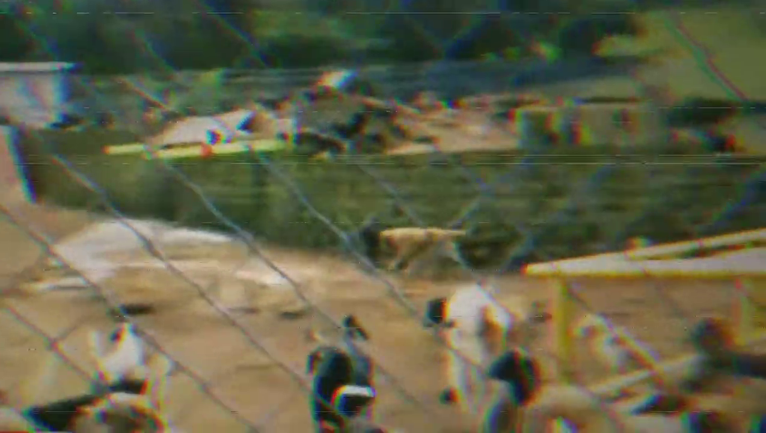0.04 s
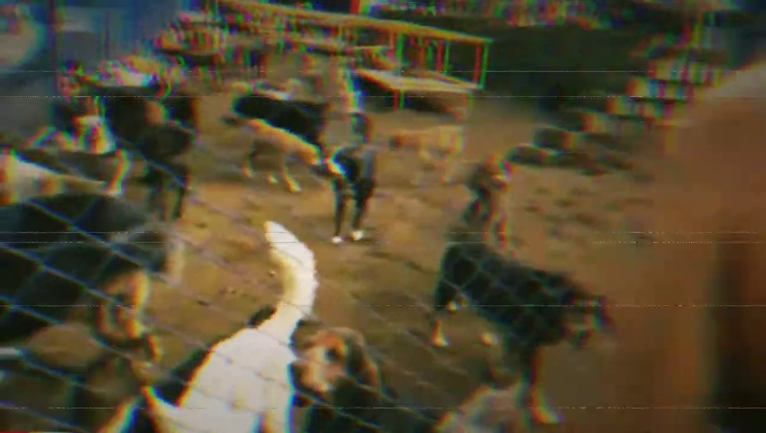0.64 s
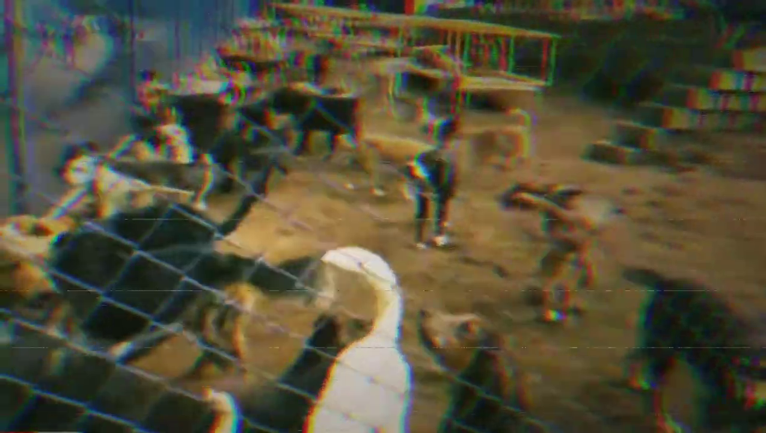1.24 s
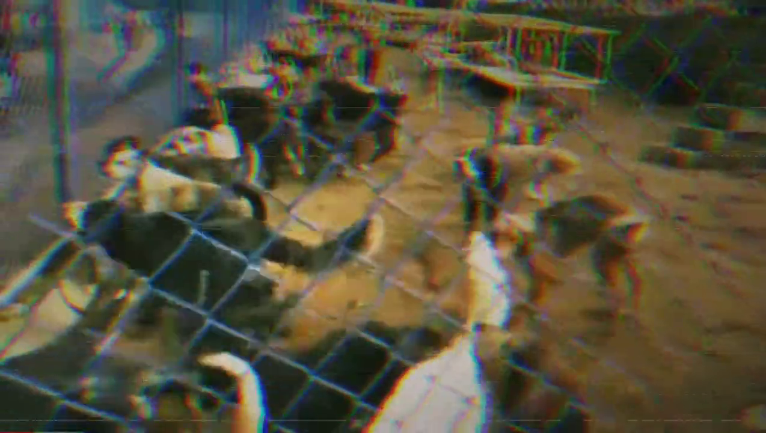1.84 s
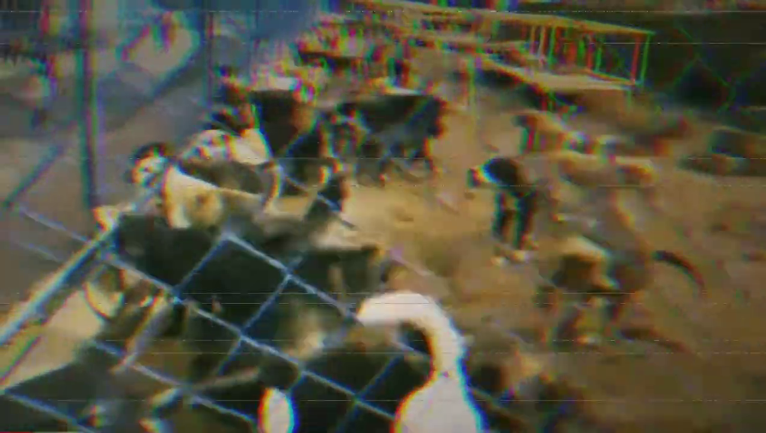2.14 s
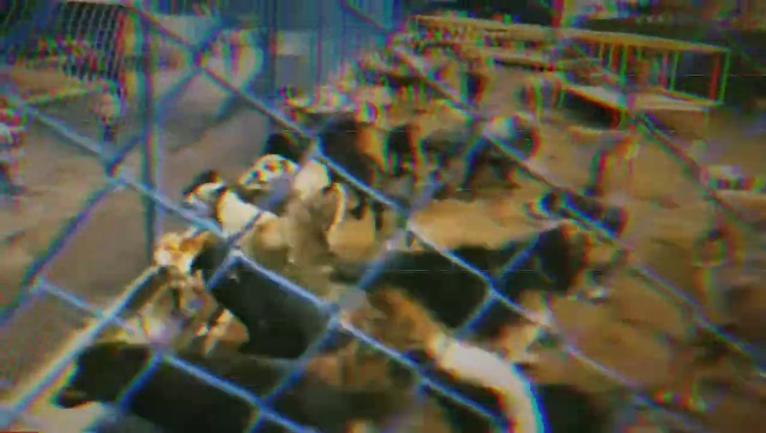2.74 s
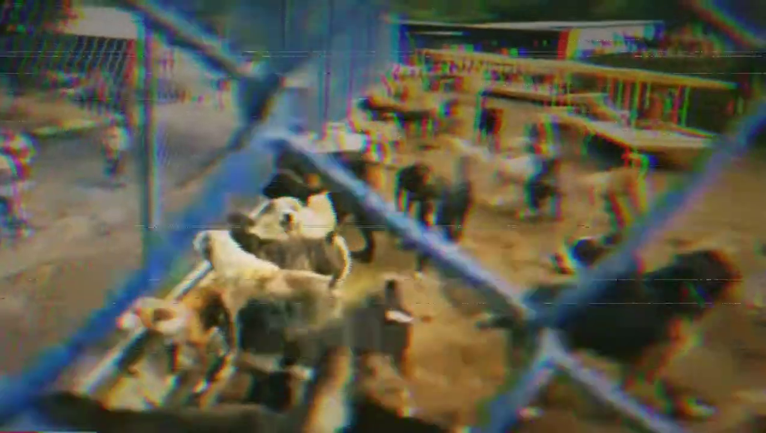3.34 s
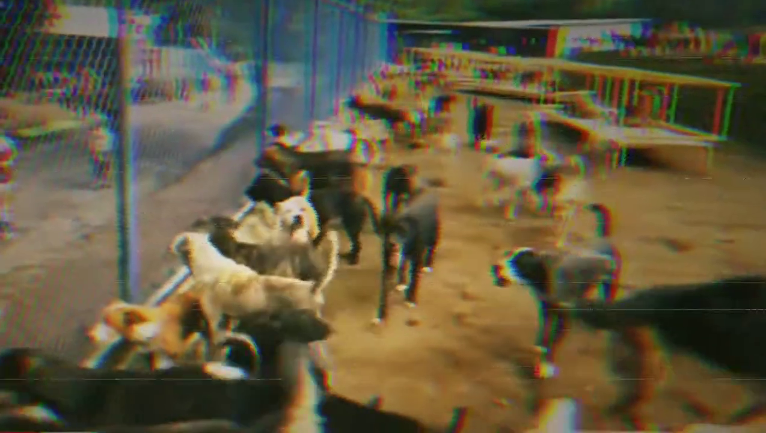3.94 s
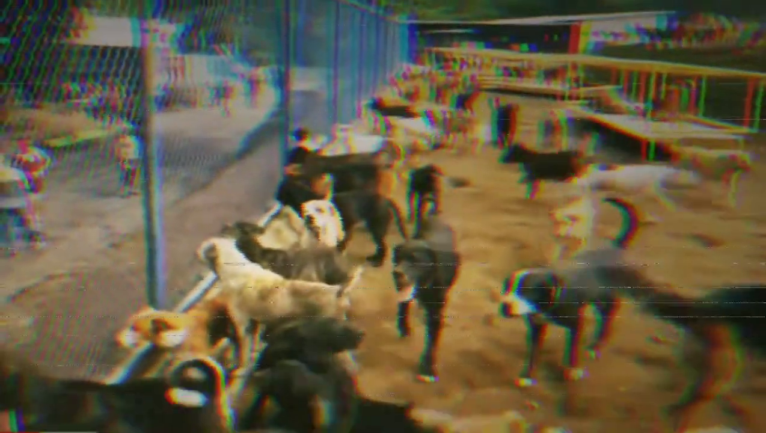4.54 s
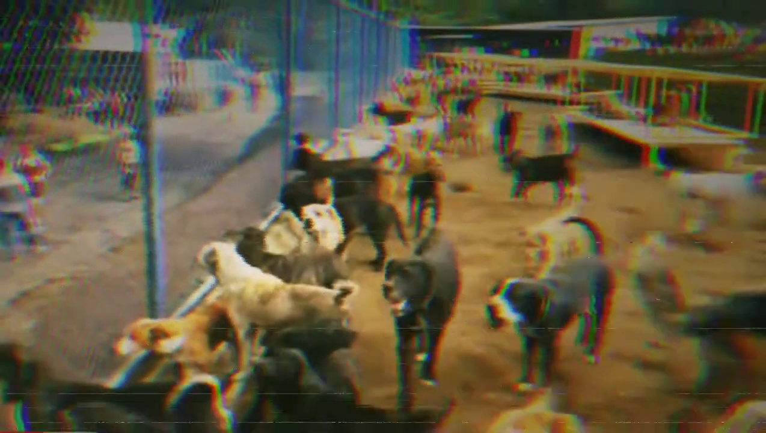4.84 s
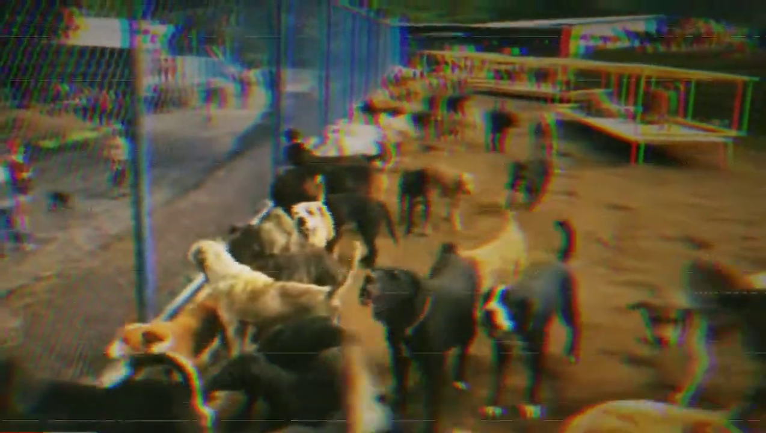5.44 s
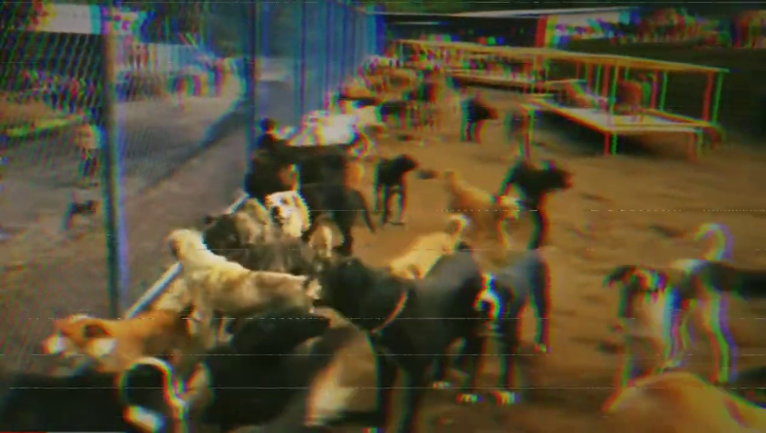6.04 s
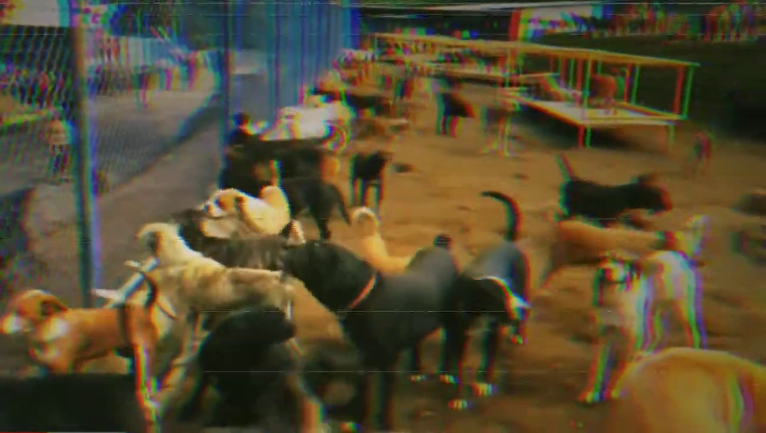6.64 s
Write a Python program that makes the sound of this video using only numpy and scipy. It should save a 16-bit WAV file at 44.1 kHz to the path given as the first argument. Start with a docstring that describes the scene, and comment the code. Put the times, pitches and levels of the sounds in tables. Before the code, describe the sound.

Many dogs bark and yelp over each other from start to finish, heard from the fence of an outdoor yard. The near barks are quick and loud, some clean and some rough, with distant barking behind them and an occasional quiet groan or whistling whine. The sharpest yelps come in the first half and slightly overload the microphone. Light handling rumble dies down early, leaving the chorus over a gentle open-air hush and a slight echo.

```python
"""An open dirt yard, heard from the fence, where a pack of dogs barks and yelps all at once. Each bark is a
pitch that rises and falls, clean or hoarse, ringing through three throat resonances. A few dogs whine, and
further off more dogs bark and groan low. Walls throw back a short echo over a soft outdoor hush, and the
microphone rumbles as it is moved. The loudest barks overload the recorder, and the sound drops out once for an
instant."""
import sys
import numpy as np
from scipy import signal
from scipy.fft import rfft, irfft, next_fast_len
from scipy.io import wavfile
from scipy.ndimage import uniform_filter1d

SR = 44100
rng = np.random.default_rng(int(sys.argv[2]) if len(sys.argv) > 2 else 0)


def wrap_up_sound(samples):
    """Save the sound to the file named by the first command line argument, as 16-bit audio."""
    columns = np.atleast_2d(samples).T
    # keep every value between -1 and 1, then stretch to whole-number steps
    tamed = np.clip(columns, -1, 1)
    steps = np.round(tamed * 32767).astype(np.int16)
    wavfile.write(sys.argv[1], SR, steps)


N = 295334
TIME = np.arange(N) / SR

# Barks by the fence: (start [s], length [s], rise [s], middle pitch [Hz],
# glide from start to end [semitones], level [dB], hoarseness [0-1], voice [name])
NEAR_BARKS = [(.03, 0.1, 0.049, 606.5, 3.5, -13.5, 0.15, "yelp"),
              (.095, 0.093, 0.021, 645, -6, -7, 0.14, "yap"),
              (.167, .14, 0.034, 498.6, 3, -14, .55, "ruff"), (.187, .09, 0.038, 478, 4, -7.5, .25, "bark"),
              (.244, 0.095, 0.025, 417, 2, -19, 0.05, "woof"),
              (.325, 0.092, .012, 631.6, 0.5, -13, 0.34, "yelp"),
              (.435, 0.099, 0.05, 560, 3.5, -17, 0.2, "yelp"),
              (.554, 0.28, 0.027, 474.3, 0, -6.5, 0.06, "howl"),
              (.58, 0.078, 0.012, 637, 0.5, -17, 0.15, "yelp"),
              (.704, .14, 0.027, 489.6, 2.5, -16, 0.73, "bark"),
              (.785, 0.1, .012, 261, -8, -22.5, 0.54, "ruff"),
              (.945, 0.16, 0.051, 623, 2.5, -16.5, 0.47, "yelp"),
              (.99, 0.13, .1, 581.5, 2.5, -10.5, 0.13, "yip"),
              (1.09, .11, .03, 557.6, -3, -20, 0.44, "yelp"),
              (1.248, 0.097, 0.057, 483.5, 4.5, -7.5, 0.36, "bark"),
              (1.299, 0.13, 0.017, 768, -3.5, -14, 0.53, "shriek"),
              (1.314, .1, 0.018, 769.4, 2.5, -6, 0.46, "shriek"),
              (1.374, .11, 0.012, 683, -6, -12.5, 0.2, "yap"),
              (1.471, 0.12, 0.048, 678, -3, -7.5, 0.51, "shriek"),
              (1.56, 0.088, 0.017, 535.5, 0, -13, 0.14, "yelp"),
              (1.62, 0.091, .012, 578, -4.5, -19, .6, "yelp"),
              (1.684, 0.097, 0.032, 684, -3.5, -4, 0.09, "shriek"),
              (1.757, .1, 0.035, 492, 0.5, -12.5, 0.31, "yip"),
              (1.84, 0.22, 0.086, 594, 1, -23.5, 0.62, "ruff"),
              (1.998, 0.086, 0.065, 592.7, 2.5, -13, .05, "yelp"),
              (2.036, .08, 0.04, 690, 5.5, -3, 0.04, "yap"),
              (2.07, 0.092, 0.012, 709.5, -3.5, -16.5, 0.54, "yelp"),
              (2.105, 0.18, 0.036, 476, -2, -8.5, 0.1, "howl"),
              (2.112, .075, .06, 559, 2, -12, 0.28, "yelp"),
              (2.14, .13, 0.041, 621, 0.5, -14.5, .06, "yip"),
              (2.275, .16, 0.046, 669, -1.5, -16.5, 0.64, "yelp"),
              (2.286, 0.074, 0.051, 667, 5, -4, 0.2, "yap"), (2.4, 0.1, 0.021, 525, 0, -22, 0.48, "yelp"),
              (2.516, 0.088, 0.044, 685, 5.5, -8.5, 0.06, "shriek"),
              (2.549, .16, 0.01, 596, 0.5, -18, 0.42, "yelp"),
              (2.613, .13, 0.059, 705, -1.5, -14, 0.1, "yap"),
              (2.688, 0.1, 0.035, 553, 2.5, -10.5, 0.09, "yip"),
              (2.718, .1, 0.035, 601.4, -2, -9.5, 0.07, "yip"),
              (2.725, .12, 0.016, 705.5, -2, -18.5, 0.44, "yelp"),
              (2.732, 0.099, 0.067, 489, 1.5, -14.5, 0.1, "yip"),
              (2.892, 0.098, 0.087, 395, 7, -16.5, 0.08, "yelp"),
              (2.918, 0.13, 0.017, 693.4, -6, -10.5, 0.56, "shriek"),
              (2.929, 0.18, 0.03, 425.2, 6.5, -16.5, 0.6, "bark"),
              (3.01, .11, .0094, 696, -8.5, -10.5, 0.24, "yap"),
              (3.012, .11, 0.034, 466, -1, -13, 0.06, "woof"),
              (3.084, .11, 0.089, 714, -3, -18, 0.6, "yip"),
              (3.087, 0.23, 0.11, 474.2, 0, -6.5, 0.11, "howl"),
              (3.196, 0.098, 0.073, 484, 9.5, -12.5, 0.33, "yelp"),
              (3.238, 0.094, 0.049, 705.6, 5, -8, .05, "shriek"),
              (3.258, .13, 0.015, 582.6, 4.5, -16, 0.76, "yelp"),
              (3.535, 0.16, 0.084, 472, 2, -14.5, 0.73, "bark"),
              (3.57, 0.1, .06, 705, 3.5, -6.5, 0.04, "shriek"),
              (3.686, .14, 0.058, 497, 6, -19.5, 0.43, "bark"),
              (3.787, .19, 0.075, 472, 0, -14.5, 0.05, "howl"),
              (3.817, .14, 0.067, 512, 0.5, -20.5, 0.36, "yelp"),
              (3.997, .17, 0.014, 571.5, -2, -21, .42, "yip"),
              (4.001, 0.16, .037, 500.4, 1, -13.5, .92, "woof"),
              (4.072, 0.13, .013, 442.5, 0, -16, 0.03, "ruff"),
              (4.119, 0.18, 0.014, 464, -2, -10.5, 0.02, "howl"),
              (4.142, 0.17, .026, 580, -1, -18, 0.8, "yip"),
              (4.327, .17, 0.12, 625.6, -6.5, -13.5, 0.02, "yap"),
              (4.33, .2, 0.039, 515, 4, -19.5, 0.51, "bark"),
              (4.485, .17, 0.077, 632, -1.5, -15.5, 0, "yap"),
              (4.503, .11, 0.03, 290, 1.5, -15.5, 0.54, "bark"),
              (4.517, 0.14, .023, 478, 1, -11.5, 0.9, "woof"),
              (4.64, 0.12, 0.038, 482, -2, -21, 0.39, "bark"),
              (4.771, .15, 0.09, 652.4, -5, -14.5, 0.02, "yap"),
              (4.8, .12, 0.024, 680, -2.5, -18, 0.71, "yelp"), (4.904, 0.14, .1, 611, 1, -15.5, 0.3, "yap"),
              (4.935, .22, 0.021, 457.5, -0.5, -13, 0.74, "woof"),
              (4.992, .11, 0.052, 437.4, 7.5, -14, 0.12, "ruff"),
              (5.034, 0.14, 0.096, 485, 0, -18, 0.64, "yelp"),
              (5.109, 0.23, 0.013, 469, 1, -11, 0.17, "howl"),
              (5.141, 0.089, .0075, 685, -3, -16.5, 0.43, "yip"),
              (5.17, .15, 0.091, 672, -2, -17.5, 0.72, "yelp"),
              (5.264, 0.19, .016, 638.6, -4, -18, 0.66, "yip"),
              (5.285, .15, .017, 474, -2, -10, 0.56, "woof"),
              (5.43, 0.12, 0.031, 497.5, 6.5, -25, 0.4, "yelp"),
              (5.55, .17, 0.07, 644, 0, -20.5, 0.71, "yelp"),
              (5.59, .17, 0.025, 455.6, 1, -17, 0.42, "woof"),
              (5.773, .14, .065, 494.2, 1.5, -11.5, 0.44, "bark"),
              (5.75, 0.21, 0.039, 673, 3.5, -20, 0.84, "yip"),
              (5.965, 0.24, 0.051, 476.6, 0.5, -10.5, 0.24, "howl"),
              (5.975, .16, 0.059, 513, -2.5, -13, .48, "woof"),
              (6.004, 0.11, 0.0064, 621, -4, -18.5, 0.5, "shriek"),
              (6.116, 0.13, .037, 594, 3, -24.5, 0.3, "yip"),
              (6.248, 0.17, 0.032, 519.6, -1, -21.5, 0.85, "bark"),
              (6.251, 0.12, 0.074, 471.4, -3.5, -17.5, 0, "ruff"),
              (6.426, 0.17, 0.048, 482.3, 2, -11, 0.59, "woof"),
              (6.435, .135, 0.024, 617, -3, -14, 0.6, "yap")]
# Low groans of big dogs: (start [s], length [s], middle pitch [Hz], glide [semitones], level [dB])
GROANS = [(0.26, 0.098, 314, -10.5, -33), (0.769, 0.16, 270, -10, -33.5), (0.875, 0.26, 290, 4.5, -36),
          (2.8, 0.15, 289, -10.5, -41), (4.187, 0.11, 326, -8, -42), (4.471, .14, 340, -9, -33.5),
          (4.873, 0.14, 376, -12, -31), (5.34, 0.12, 372.5, -9.5, -28), (6.329, 0.17, 326, -3.5, -27),
          (6.578, .14, 355, -4, -28)]
# Kinds of voice, by name: (fade [s], pitch arch [semitones], first resonance [Hz],
# second resonance [Hz], its level [dB], third resonance [Hz], its level [dB], high overtones [dB])
VOICES = {"yap": (0.07, 2, 640, 1151, -22, 2099.5, -22.5, -47.5),
          "shriek": (0.08, 2.15, 671, 1100, -25, 2299, -13.5, -45),
          "yip": (0.07, 1.0, 552, 1220, -10, 2198.5, -16.5, -44.5),
          "yelp": (0.0437, 0.73, 640.5, 1238, 0, 2019.5, -7.5, -38),
          "howl": (0.17, 1.36, 410.5, 1399, -13, 2201, -45, -54),
          "bark": (0.055, 5.5, 631, 1200, -8, 1949.5, -14, -44),
          "woof": (0.05, 4, 879, 1051, -17, 1850.5, -23.5, -51.5),
          "ruff": (.055, 1.36, 671.5, 1099, -20, 1849, -27.5, -47),
          "groan": (0.06, 0.33, 378.5, 1101.5, -13.5, 1902.5, -31, -49)}
# Tone of the breathy hiss around the near dogs: (frequency [Hz], level [dB])
HISS_COLOUR = [(150, -18.5), (400, -10), (2000, -27), (3300, 36), (5000, -7.5), (8000, -5), (12000, -4.5),
               (16000, -11)]
# Thin whines: (start [s], length [s], start pitch [Hz], end pitch [Hz], level [dB])
WHINES = [(0.463, 0.092, 4440, 4750, -41.5), (1.215, 0.089, 4900, 4620, -45),
          (1.796, 0.15, 4980, 4700, -51), (2.35, 0.15, 4750, 4600, -48), (5.59, 0.14, 6150, 5700, -46)]
# Rise and fall of the far dogs, who go almost silent once: (time [s], level [dB])
FAR_LEVELS = [(0, -20), (.68, -21), (.88, -26), (1.3, -18), (1.88, -20), (2.1, -16), (2.85, -25),
              (3.15, -16), (3.34, -21), (3.44, -54), (3.62, -17.5), (4.1, -15.5), (4.9, -23.5), (5.22, -13),
              (5.45, -22), (6.7, -24.5)]
# Microphone rumble, dying down as the hand steadies: (time [s], level [dB])
RUMBLE_LEVELS = [(0, -38.5), (.5, -40.5), (1, -46.5), (1.5, -57), (3.5, -54.5), (6.7, -58.5)]
# Knocks of the hand on the recorder: (time [s], level [dB])
HAND_KNOCKS = [(.44, -34), (0.569, -25), (1.72, -42.5), (2.06, -40), (2.15, -42), (4.69, -48)]
# Tone of the rumble and knocks: (frequency [Hz], level [dB])
RUMBLE_COLOUR = [(20, -9), (55, -1), (100, 0), (160, -3.5), (260, -3), (500, -34), (2000, -64.5),
                 (16000, -87.5)]
# Tone of the outdoor hush: (frequency [Hz], level [dB])
HUSH_COLOUR = [(30, -20), (200, -4), (500, 1), (1400, -7), (2500, -17.5), (4000, -27), (9000, -30),
               (16000, -46.5)]


def bark(length, rise, fade, pitches_hz, hoarse, mouth, harmonics=24):
    """Vocal folds buzz through a throat; the hoarser the dog, the more unevenly they beat."""
    t = np.arange(int(length * SR)) / SR
    jitter, flutter, pairing, breath = rng.standard_normal((4, SR // 2))[:, :len(t)]
    # the pitch curves through its start, middle and end values, and shakes a little
    pitch = np.polyval(np.polyfit([0, .5, 1], pitches_hz, 2), t / t[-1])
    pitch *= 1 + (.0065 + .02 * hoarse) * waver(jitter, rate_hz=75)
    phase = 2 * np.pi * np.cumsum(pitch) / SR
    # overtones come and go as the jaw and head move, the high ones most
    shimmer_times = np.linspace(0, .45, 32)
    depth_db = 5 * np.minimum(np.arange(harmonics + 1) / 6, 1)
    shimmer_db = rng.standard_normal((harmonics + 1, len(shimmer_times))) * depth_db[:, None]
    # the folds never close twice alike, which blurs the high overtones
    slip = .005 * waver(rng.standard_normal(SR // 2), rate_hz=160)[:len(t)]
    folds = np.zeros(len(t))
    for k in range(1, harmonics + 1):
        shimmer = from_db(np.interp(t, shimmer_times, shimmer_db[k]))
        folds += np.sqrt(2) * shimmer * np.cos(k * phase + k * k * (.5 + slip))
    # uneven beats roughen each overtone; strong-weak pairs add tones halfway between them
    uneven = from_db(-3) * waver(flutter, rate_hz=170)
    uneven += from_db(-8) * np.sqrt(2) * np.cos(phase / 2) * waver(pairing, rate_hz=19.5)
    # a puff of air escapes each time the folds open
    rasp = from_db(-6) * breath * (1 + np.cos(phase)) * np.sqrt(SR / (3 * pitches_hz[1]))
    buzz = folds * (np.sqrt(1 - hoarse ** 2) + hoarse * uneven) + hoarse * rasp
    fade_in = np.sin(np.pi / 2 * np.clip(t / rise, 0, 1)) ** 2
    fade_out = np.sin(np.pi / 2 * np.clip((t[-1] - t) / fade, 0, 1)) ** 2
    stretch = rng.uniform(.8, 1.25)  # muzzles vary from dog to dog
    return filtered(buzz * fade_in * fade_out, lambda hz: throat(hz, *mouth, stretch))


def throat(hz, first_hz, second_hz, second_db, third_hz, third_db, overtone_db, stretch=1):
    """How much of each frequency a throat and mouth let out: most at the resonances, where they ring."""
    def peak(centre_hz, half_width_hz, steepness=1.41):
        return (1 + ((hz - centre_hz) / half_width_hz) ** 2 / steepness) ** -steepness
    ringing = peak(first_hz, half_width_hz=225)
    ringing += from_db(second_db) * peak(second_hz, half_width_hz=290)
    ringing += from_db(third_db) * peak(third_hz, half_width_hz=383)
    low_hz, high_hz = 375, 2920  # a dog gives off little outside this range
    edge_loss = np.sqrt((1 + (low_hz / (hz + 1)) ** 8) * (1 + (hz / high_hz) ** 16))
    muzzle_db = -.5 * np.cos(2 * np.pi * hz / (1980 * stretch))  # evenly spaced upper resonances
    airy_top = peak(4000, half_width_hz=3220) + from_db(-18) * peak(11600, half_width_hz=5100)
    return ringing / edge_loss + from_db(overtone_db + muzzle_db) * airy_top


def dog_call(length, rise, hz, glide, level_db, hoarse, voice):
    """One bark in a named voice, turned up to make up for what the throat holds back."""
    fade, arch, *mouth = VOICES[voice]
    end_semitones = np.array([-glide, glide]) / 2 - arch
    start_hz, end_hz = hz * 2 ** (end_semitones / 12)
    throat_gain = np.linalg.norm(throat(hz * np.arange(1, 7), *mouth))
    return from_db(level_db) * bark(length, rise, fade, (start_hz, hz, end_hz), hoarse, mouth) / throat_gain


def near_dogs(hiss_db=-44, groan_rise_s=.019):
    """Barks by the fence and low falling groans from dogs further off, with a breathy hiss that follows their
    strength."""
    voices = np.zeros(N)
    for start, *shape in NEAR_BARKS:
        add(voices, start, dog_call(*shape))
    for start, length, hz, glide, level_db in GROANS:
        groan = dog_call(length, groan_rise_s, hz, glide, level_db, hoarse=.088, voice="groan")
        add(voices, start, groan)
    return voices + from_db(hiss_db) * strength_of(voices) * coloured_noise(HISS_COLOUR)


def whines(unsteadiness=.003):
    """Dogs whistle through their noses, each whine a single sliding tone."""
    track = np.zeros(N)
    for start, length, start_hz, end_hz, level_db in WHINES:
        size = int(length * SR)
        wobble = unsteadiness * waver(rng.standard_normal(SR), rate_hz=60)[:size]
        pitch = np.linspace(start_hz, end_hz, size) * (1 + wobble)
        tone = np.sin(2 * np.pi * np.cumsum(pitch) / SR)
        add(track, start, from_db(level_db) * np.hanning(size) * tone)
    return track


def far_dogs(count=60):
    """Dogs of all sizes further back, barking so often that they blend together."""
    voices = np.zeros(N)
    for k, (when, smallness, duration, jaw, arch) in enumerate(rng.random((count, 5))):
        hz = 290 + 400 * smallness
        pitches_hz = (hz * (.9 - .2 * arch), hz, hz * .72)
        mouth = (450 + 300 * jaw, 1150 + 400 * smallness, -5, 1900 + 600 * jaw, -12, -42)  # see throat
        sound = bark(length=.16 + .099 * duration, rise=.026, fade=.054, pitches_hz=pitches_hz,
                     hoarse=.31, mouth=mouth, harmonics=14)
        add(voices, (k + when - 1) / count * N / SR, sound)
    return level_curve(FAR_LEVELS) * unit_strength(voices)


def yard_echo(sound, die_away_s=.41, first_echo_s=.013, dull_hz=3500):
    """Walls, kennels and ground throw back scattered, dull echoes."""
    t = np.arange(SR // 2) / SR
    echoes = rng.standard_normal(len(t)) * (rng.random(len(t)) < .03)
    echoes *= from_db(-60 * t / die_away_s) * (t > first_echo_s)
    echoes /= np.sqrt(np.sum(echoes ** 2))
    treble_cut = signal.butter(1, dull_hz, fs=SR, output="sos")
    return signal.sosfilt(treble_cut, signal.fftconvolve(sound, echoes)[:N])


def microphone_rumble(dogs, thud_db=-43, knock_rise_s=.0076, decay_db_per_s=398):
    """A hand rubs and knocks the microphone; a dull thud also comes with each loud bark."""
    gain = level_curve(RUMBLE_LEVELS) + from_db(thud_db) * strength_of(dogs)
    for start, level_db in HAND_KNOCKS:
        age = np.maximum(TIME - start, 0)
        decay_db = decay_db_per_s * np.maximum(age - knock_rise_s, 0)
        gain += np.minimum(age / knock_rise_s, 1) * from_db(level_db - decay_db)
    return gain * coloured_noise(RUMBLE_COLOUR)


def outdoor_hush(level_db=-44.5):
    """The soft, steady noise of the open air."""
    return from_db(level_db) * coloured_noise(HUSH_COLOUR)


def from_db(db):
    """Turn decibels into a number to multiply by."""
    return 10 ** (np.asarray(db) / 20)


def unit_strength(x):
    """Scale a sound so its average strength (root mean square) is 1."""
    return x / np.sqrt(np.mean(x ** 2) + 1e-20)


def strength_of(x):
    """How strong a sound is from moment to moment, over about 14 ms."""
    return np.sqrt(np.abs(uniform_filter1d(x ** 2, size=600)))


def level_curve(rows):
    """Join (time [s], level [dB]) points into a gain for every sample."""
    return from_db(np.interp(TIME, *np.transpose(rows)))


def filtered(x, gain_at):
    """Turn each frequency up or down by gain_at(hz)."""
    size = next_fast_len(len(x))
    hz = np.arange(size // 2 + 1) * SR / size
    return irfft(rfft(x, size) * gain_at(hz), size)[:len(x)]


def coloured_noise(colour):
    """Noise of strength 1, shaped by (frequency [Hz], level [dB]) points."""
    hz, db = np.transpose(colour)
    white = rng.standard_normal(N)
    return unit_strength(filtered(white, lambda f: from_db(np.interp(np.log(f + 1), np.log(hz), db))))


def waver(noise, rate_hz):
    """Smooth noise into a random wobble of strength 1, up to about rate_hz."""
    return unit_strength(filtered(noise, lambda f: 1 / (1 + (f / rate_hz) ** 4)))


def add(track, start_s, sound):
    """Mix a sound into the track."""
    at = int(np.clip(start_s * SR, 0, N))
    track[at:at + len(sound)] += sound[:N - at]


def scene(near_db=.72, far_db=-10, echo_db=-20):
    """Mix the dogs, their echo, the rumble and the hush into one channel."""
    dogs = from_db(near_db) * near_dogs() + whines() + from_db(far_db) * far_dogs()
    hush = outdoor_hush()
    return (dogs + from_db(echo_db) * yard_echo(dogs) + microphone_rumble(dogs) + hush)[None]


def record(dry, limit=1.12, release_db_per_s=150, clip_at=.71, gap_s=(.763, .782), top_hz=15800):
    """Turn loud barks down, clip the peaks left, drop out once briefly and cut the highest treble."""
    over_db = 20 * np.log10(np.maximum(np.abs(dry[0]) / limit, 1))
    # after each peak the volume creeps back up
    held_db = np.maximum.accumulate(over_db + release_db_per_s * TIME) - release_db_per_s * TIME
    smooth_db = signal.lfilter([.01], [1, -.99], held_db)
    clipped = np.clip(dry * from_db(-smooth_db), -clip_at, clip_at)
    in_gap = (TIME > gap_s[0]) & (TIME < gap_s[1])
    gap_gain = 1 - uniform_filter1d(in_gap.astype(float), size=40)
    treble_cut = signal.ellip(10, .1, 80, top_hz, fs=SR, output="sos")
    return signal.sosfilt(treble_cut, clipped * gap_gain)


dry = scene()
out = record(dry)
wrap_up_sound(out)
```